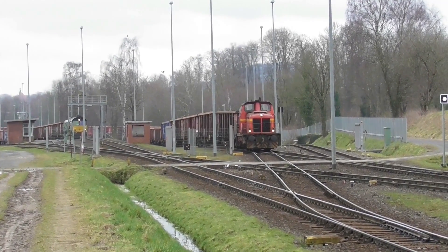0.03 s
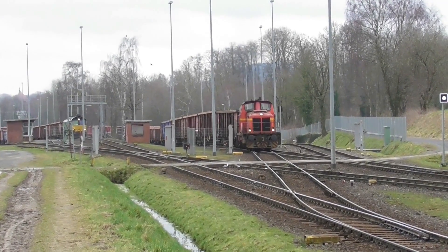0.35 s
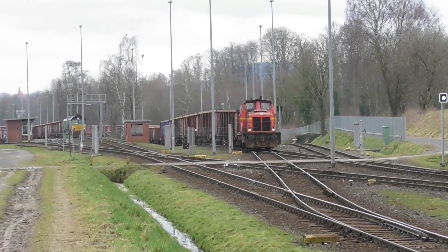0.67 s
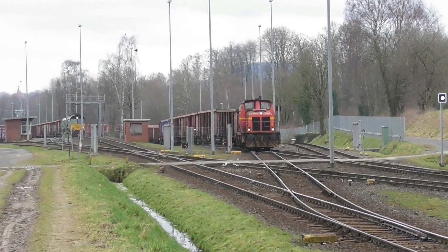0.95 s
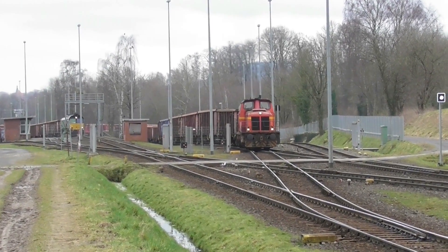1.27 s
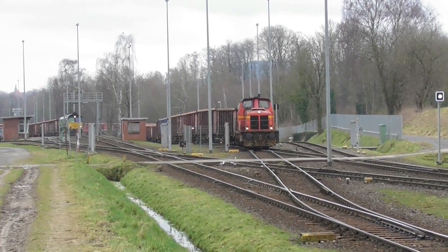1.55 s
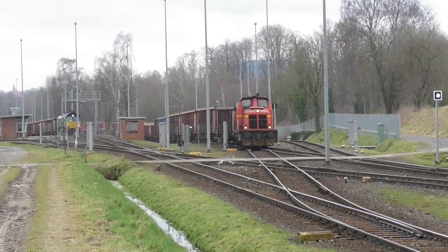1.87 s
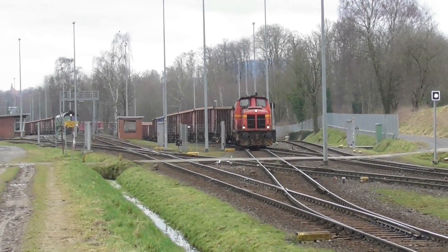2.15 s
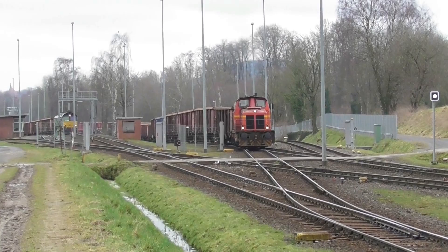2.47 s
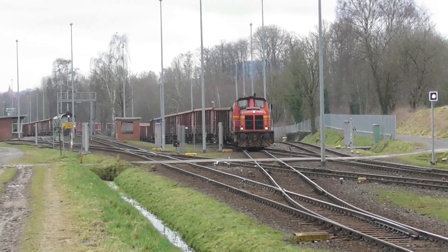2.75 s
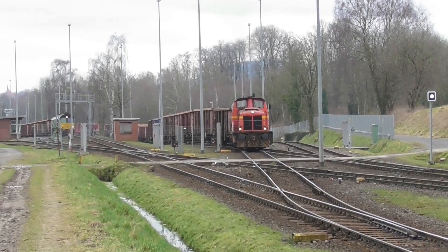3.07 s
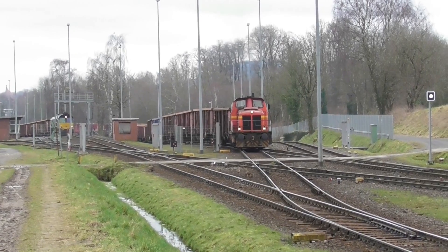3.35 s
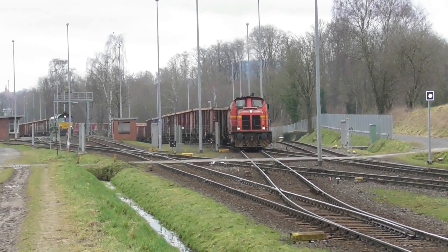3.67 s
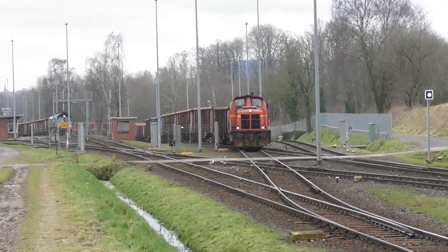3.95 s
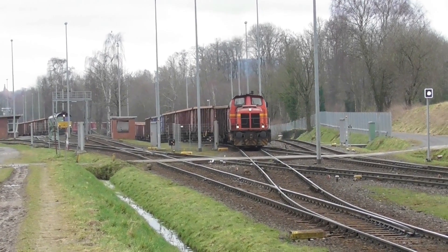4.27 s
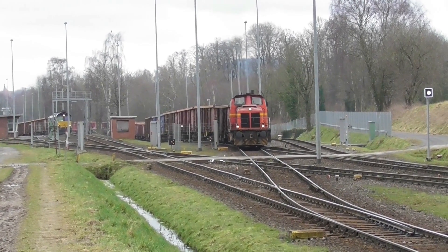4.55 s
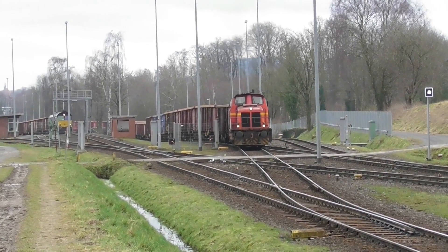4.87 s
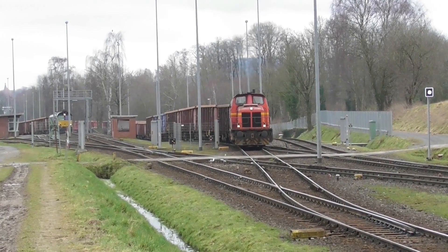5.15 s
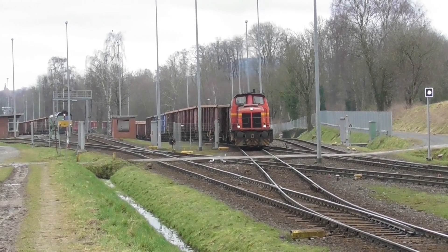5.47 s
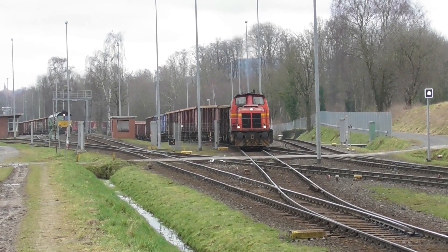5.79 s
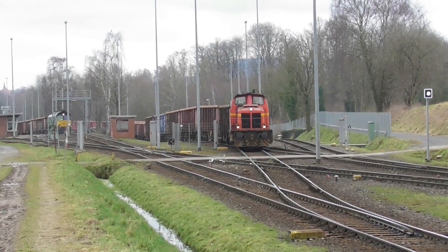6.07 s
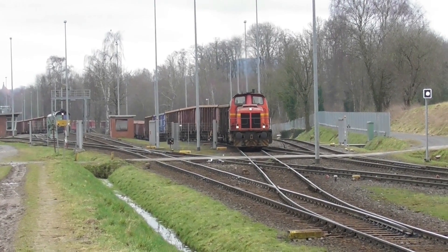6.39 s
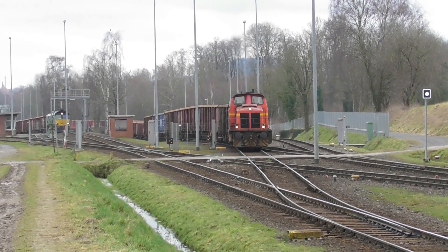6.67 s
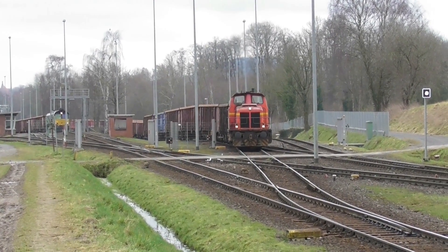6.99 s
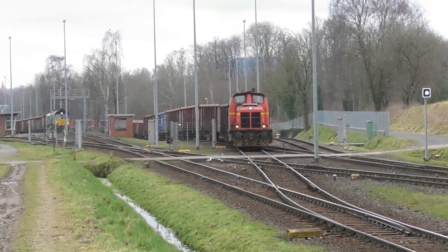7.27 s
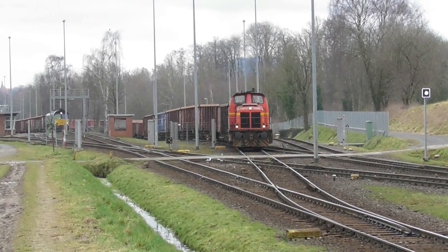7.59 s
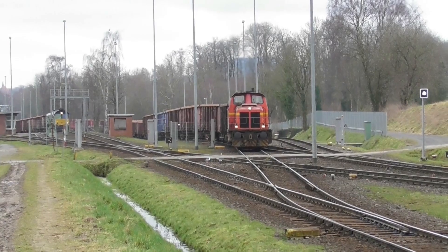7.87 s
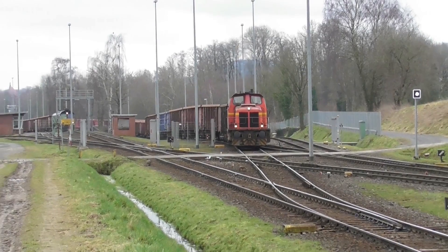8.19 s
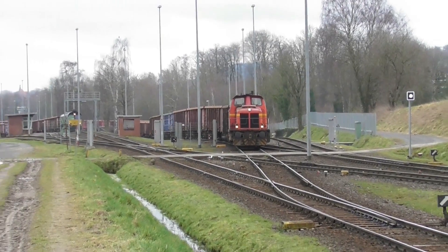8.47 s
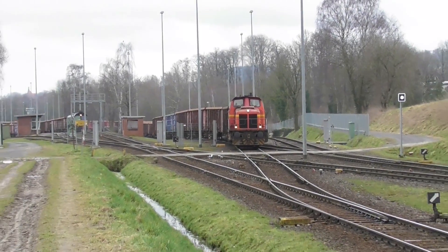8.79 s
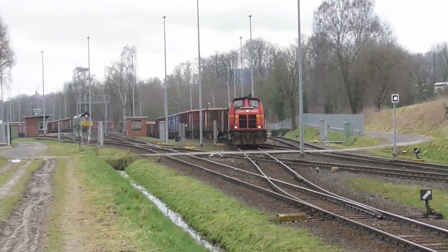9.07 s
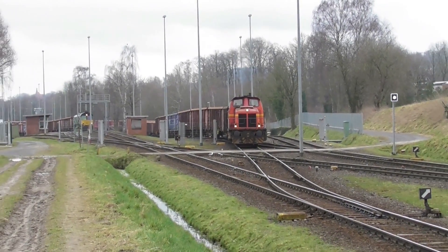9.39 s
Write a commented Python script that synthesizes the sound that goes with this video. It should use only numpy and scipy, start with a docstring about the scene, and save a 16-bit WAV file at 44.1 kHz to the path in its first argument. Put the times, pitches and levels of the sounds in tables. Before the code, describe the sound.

A diesel shunting locomotive pulls wagons slowly across an open rail yard, heard from a distance through a stereo microphone. Throughout the nine and a half seconds, its engine holds a strong, low drone at a steady pitch, with a pulsing exhaust rasp, blurred valve clatter and a light hiss of air. A quieter gear whine climbs gradually as the train gathers pace, and the clatter grows slightly from about 3 seconds. From 4.5 to 6.2 seconds, wheel flanges squeal on the points in a string of short, high, fluttering bursts that ring and echo, ending on a lower note. At about 4.9 seconds the overall level drops a little, recovering by 6.4 seconds. One faint squeal comes at around 8.3 seconds. A soft, bright hiss swells from 9.2 seconds to the end, over the continuing drone.

```python
"""Diesel shunter in a rail yard

A six-cylinder shunter hauls wagons slowly across the yard toward a camera's stereo microphone.
Its governed engine drones and rasps at the stack, valves clatter in the distance, air hisses, and
the gears whine higher as the train gathers pace. Halfway, wheel flanges squeal in the points and
echo off trees and wagons, and the level dips briefly. A bright hiss swells at the very end."""
import sys
import numpy as np
from scipy import signal
from scipy.fft import rfft, irfft, next_fast_len
from scipy.io import wavfile
from scipy.ndimage import map_coordinates

SR = 44100
rng = np.random.default_rng(int(sys.argv[2]) if len(sys.argv) > 2 else 0)


def wav_out(sig):
    """Save sig, one row per channel (or a flat mono array), as 16-bit PCM at SR to the path in sys.argv[1]."""
    wavfile.write(sys.argv[1], SR, np.round(np.clip(np.atleast_2d(sig).T, -1, 1) * 32767).astype(np.int16))


N = 416304

# How alike the engine's noise is left and right. Each row: frequency in Hz, coherence from 0 to 1.
ENGINE_COHERENCE = [(30, .5), (120, 1), (250, 0.55), (500, .9), (1000, 0.87), (2000, 0.94), (4000, 0.97),
                    (6100, 1), (8000, 1)]
# Rise and fall of the valve clatter. Each row: time in seconds, relative level in dB.
CLATTER_DB = [(0, -31.5), (2.4, -31), (3.2, -28.6), (5.6, -28.5), (6.0, -26.5), (7.7, -27.5), (9.44, -27.8)]
CYLINDERS, SHAFT_START_HZ = 6, 22.38
SIDES = np.array([[0.5], [-0.5]])  # shares a left-minus-right difference between the channels


def amp(db):
    """Decibels to gain."""
    return np.exp(np.asarray(db) * (np.log(10) / 20))


def along(points, hz):
    """Rows of frequency and value, read on a log axis."""
    freqs, values = np.transpose(points)
    return np.interp(np.log(hz + 1), np.log(freqs + 1), values)


def curve(points):
    """Rows of seconds and value, joined into one value per sample."""
    seconds, values = np.transpose(points)
    return np.interp(np.arange(N) / SR, seconds, values)


def wobble(rate):
    """A smooth random curve with rate knots a second."""
    coarse = np.arange(0, N + 64, 64)
    knots = rng.standard_normal(4096)
    return np.interp(np.arange(N), coarse, map_coordinates(knots, [coarse * rate / SR], mode="wrap"))


def turning(hz):
    """Angle of something that turns at hz."""
    return 2 * np.pi * np.cumsum(hz) / SR


def filtered(x, response):
    """x shaped by a complex response of frequency."""
    size = next_fast_len(N + SR // 4, True)
    return irfft(rfft(x, size) * response(np.fft.rfftfreq(size, 1 / SR)), size)[..., :N]


def rush(spectrum, coherence, gate=1):
    """Stereo noise of rms 1, gated before it is coloured."""
    def colour(hz):
        spread = np.arccos(np.clip(along(coherence, hz), -1, 1)) / 2
        return amp(along(spectrum, hz)) * [np.cos(spread), np.sin(spread)]
    mid, side = filtered(gate * rng.standard_normal((2, N)), colour)
    stereo = np.array([mid + side, mid - side])
    return stereo / np.sqrt(np.mean(stereo ** 2))


def tone(angle, db):
    """A sine of the given rms level, starting anywhere in its cycle."""
    return np.sqrt(2) * amp(db) * np.sin(angle + rng.uniform(0, 2 * np.pi))


def engine_cycle():
    """Angle of the governed four-stroke cycle: every cylinder fires once a turn."""
    # Each row: time in seconds, firing rate in Hz.
    firing_hz = [(0, 88.68), (2.0, 88.78), (4.0, 89.16), (6.0, 88.84), (7.4, 89), (9.44, 88.77)]
    return turning(curve(firing_hz)) / CYLINDERS


def engine_drone(cycle, waver_db=2.0, steady_db=0.1, sway_db=0.32, clatter_share=0.41):
    """Firing harmonics add up to one pulse per cylinder; the orders between come from the block."""
    # Engine tones. Each row: multiple of the cycle rate, level in dB.
    orders = [(5, -46.5), (6, -8), (7, -33.5), (8, -44.5), (9, -38), (10, -46.5), (11, -46.5), (12, -25),
              (18, -38.5), (26, -46.5), (27, -52), (29, -41.5), (30, -37), (32, -41.5), (33, -42.5),
              (34, -46), (35, -42), (36, -31.5), (40, -52), (42, -44.5), (43, -37), (44, -44.5),
              (51, -56.5), (54, -52), (62, -50), (70, -41.5), (84, -41.5), (127, -40.5)]
    # The drone leans slightly right for a while. Each row: time in seconds, left minus right in dB.
    lean_db = [(0, .35), (3, 0.4), (7, -0.7), (9.44, 0)]
    clatter_db = curve(CLATTER_DB)
    out = np.zeros(N)
    for order, db in orders:
        angle = order * cycle
        if 30 <= order < 45:  # near the exhaust's peak, 440 to 650 Hz, tones follow the clatter
            db = db + clatter_share * (clatter_db - np.mean(clatter_db))
        if order in (CYLINDERS, 2 * CYLINDERS):  # the firm pressure wave from the stack
            depth_db = steady_db * order / (2 * CYLINDERS)
            out += np.sqrt(2) * amp(db + depth_db * wobble(11)) * np.sin(angle)
        elif order % CYLINDERS == 0:  # the pipe rings on each crest, wavering in the outdoor air
            out += np.sqrt(2) * amp(db + waver_db * wobble(4)) * np.cos(angle)
        else:
            out += tone(angle, db + waver_db * wobble(4))
    return out * amp(sway_db * wobble(2)) * amp(SIDES * curve(lean_db))


def exhaust_rasp(cycle, shaft_hz, start_db=-25.5, ease_db_per_hz=0.48, puff=0.33, lope=0.066):
    """Each firing puffs noise out of the stack; unequal cylinders make it lope once a cycle."""
    # Each row: frequency in Hz, relative noise density in dB.
    spectrum = [(20, -15), (35, -1.5), (60, 4.5), (125, 3), (200, -2.5), (300, -2), (400, -5), (480, -2.5),
                (630, 0), (720, -9.5), (1000, -33.5), (2000, -69)]
    puffs = (1 + puff * np.cos(CYLINDERS * cycle)) * (1 + lope * np.cos(cycle))
    level_db = start_db - ease_db_per_hz * (shaft_hz - SHAFT_START_HZ)  # eases as the train speeds up
    return amp(level_db + 0.43 * wobble(5.8)) * rush(spectrum, ENGINE_COHERENCE, puffs)


def clatter_and_hiss(cycle, knock=0.15, throb=0.064):
    """Valve and injector clatter blurred by distance, and the hiss of air through the engine."""
    # Colour of each noise. Each row: frequency in Hz, relative noise density in dB.
    clatter_spectrum = [(400, -30.5), (700, -14), (860, 1.5), (1080, 2.5), (1280, 0.5), (1500, 3.5),
                        (1680, -0.5), (1950, 2), (2300, -1), (2550, -6.5), (2900, -1.5), (3800, -11),
                        (4300, -41), (8000, -80.5)]
    hiss_spectrum = [(1500, -17.5), (2500, -4.5), (3000, -3), (3800, 1), (4000, -8), (4220, -6),
                     (4430, -15.5), (4700, -10), (5600, -9), (6120, 2.5), (6600, -12), (7000, -18),
                     (7600, -22), (10000, -39)]
    # Rise and fall of the hiss. Each row: time in seconds, relative level in dB.
    hiss_db = [(0, -40.5), (.8, -39.5), (1.7, -38.5), (2.35, -35), (3.9, -42), (4.75, -39), (5.3, -40),
               (7.6, -40), (8.8, -36), (9.44, -35)]
    knocks = 1 + knock * np.cos(2 * CYLINDERS * cycle)
    throbs = 1 + throb * np.cos(cycle) + throb / 2 * np.cos(CYLINDERS * cycle)
    clatter = rush(clatter_spectrum, ENGINE_COHERENCE, knocks)
    hiss = rush(hiss_spectrum, ENGINE_COHERENCE, throbs)
    clatter *= amp(curve(CLATTER_DB) + 4 + 0.5 * wobble(9))
    hiss *= amp(curve(hiss_db) + 5.5 + 0.57 * wobble(12))
    return clatter + hiss


def flange_squeal(wander_hz=9, flutter_db=1.5, arch=0.53, ring_db=-11, t60=1.9,
                  twin_split=0.012, twin_db=-8.5):
    """A flange sticks and slips on the rail: twin wheel modes swell, beat, flutter and ring on."""
    # Bites on the rail. Each row: start in seconds, length in seconds, wheel mode in Hz, level in dB.
    bites = [(4.462, 0.18, 5120, -36), (4.622, 0.13, 5090, -39.5), (4.738, 0.098, 4900, -40),
             (4.771, 0.15, 2780, -25.5), (4.789, 0.23, 5020, -31.5), (4.79, .22, 9930, -61.5),
             (4.913, 0.075, 2770, -17.5), (4.9, .26, 4540, -47.5), (4.97, 0.17, 2757, -16.5),
             (5.1, 0.064, 5010, -36), (5.138, .14, 2763, -15.5), (5.33, 0.08, 2770, -15),
             (5.461, .23, 2757, -21.5), (5.49, .09, 4680, -43.5), (5.588, .16, 8030, -63),
             (5.579, 0.45, 2940, -27), (5.601, .36, 5050, -42), (5.781, 0.22, 4230, -47),
             (5.77, 0.28, 2103, -25.5), (6.05, 0.11, 2100, -28), (8.33, 0.42, 2575, -35)]
    t, out = np.arange(N) / SR, np.zeros(N)
    drift = turning(wander_hz * wobble(110))
    flutter = amp(flutter_db * wobble(70))
    for start, length, hz, db in bites:
        sounding = (t > start) & (t < start + length + t60)
        age = t[sounding] - start
        bite = np.abs(np.sin(np.pi * np.minimum(age / length, 1))) ** arch  # smaller arch, flatter top
        ring = (age > length / 2) * amp(ring_db - 60 * np.maximum(age - length, 0) / t60)
        angle = 2 * np.pi * hz * age + drift[sounding] * (hz / 2100)  # higher modes wander more
        pair = tone(angle, db) + tone(angle * (1 + twin_split), db + twin_db)
        out[sounding] += flutter[sounding] * np.maximum(bite, ring) * pair
    return out


def shaft_speed(rise_hz_per_s=0.4975, cruise_s=13.3):
    """The transmission shaft, tied to the wheels, speeds up ever more gently toward its cruise."""
    t = np.arange(N) / SR
    return SHAFT_START_HZ + np.cumsum(rise_hz_per_s * (1 - (t / cruise_s) ** 2)) / SR


def gear_whine(shaft_hz, waver_db=1.95, jitter_rad=0.0072):
    """Gear tones climb with the train's speed and swell as they cross the casing's resonances."""
    # Each row: meshes per shaft turn, level in dB before the casing lifts it.
    gear_tones = [(8, -38), (16, -45.5), (21, -39.5), (24, -40), (32, -56.5), (42, -41), (55, -47.5),
                  (56, -41.5)]
    # Gear case resonances. Each row: centre in Hz, width in Hz, lift in dB.
    casing = [(192, 14, 8), (368, 16, 7), (487, 20, 7), (588, 26, 7), (618, 10, 7), (1064, 70, 10),
              (1356, 24, 17)]
    shaft_angle, out = turning(shaft_hz), np.zeros(N)
    for meshes, db in gear_tones:
        tone_hz = meshes * shaft_hz
        lift_db = sum(lift / (1 + (2 * (tone_hz - hz) / width) ** 2) for hz, width, lift in casing)
        angle = meshes * (shaft_angle + jitter_rad * wobble(14))
        out += tone(angle, db + lift_db + waver_db * wobble(4.5))
    return out


def fan(cycle, blades_per_cycle=85.6):
    """A belt-driven fan sings in step with the engine."""
    return tone(blades_per_cycle * cycle, db=-46 + 2 * wobble(2.9))


def yard_echo(x, level_db=-15.5):
    """Trees and wagons scatter the sound back; the high treble dies first."""
    # Each row: frequency in Hz, seconds to fade by 60 dB.
    decay = [(200, .5), (2500, 0.95), (10000, 0.11)]
    hz, t, noise = signal.stft(rng.standard_normal((2, SR // 2)), SR, nperseg=256)
    fade = amp(-60 * t / along(decay, hz)[:, None])
    tail = signal.istft(noise * fade, SR, nperseg=256)[1]
    tail /= np.linalg.norm(tail[0])
    return amp(level_db) * signal.fftconvolve(x[None], tail, axes=1)[:, :N]


def background_hiss():
    """A faint, even hiss lies under the train; a brighter one swells at the very end."""
    # Course of each hiss. Each row: time in seconds, level in dB.
    even_db = [(0, -55.5), (1.5, -54.5), (5, -55), (9.44, -58.5)]
    swell_db = [(9.15, -83.5), (9.3, -57.5), (9.44, -46)]
    # Colour of each hiss. Each row: frequency in Hz, relative noise density in dB.
    even_spectrum = [(1000, -5.5), (8000, -2), (12000, -3), (15800, -5)]
    swell_spectrum = [(2000, -26), (5000, -6.5), (9000, -13.5), (14000, -32)]
    even = amp(curve(even_db)) * rush(even_spectrum, coherence=[(1000, 0.66)])
    swell = amp(curve(swell_db)) * rush(swell_spectrum, coherence=[(1000, 0.9)])
    return even + swell


def microphone_ports(x):
    """The two ports hear each frequency at a different level and phase."""
    # Each row: frequency in Hz, left minus right in dB.
    balance = [(30, 4.5), (100, -1.35), (170, -1.3), (300, -5), (510, -2.5), (860, -3), (1470, 1.3),
               (2500, 0.4), (4270, 2), (6000, 0)]
    # Each row: frequency in Hz, phase lead of the left port in radians.
    lead = [(90, 0), (260, 0.26), (500, .7), (690, 0.88), (950, 0.62), (1890, 0.25), (2150, 0.49),
            (2670, 0.22), (3400, 0.15), (5170, 0.2), (7410, 0)]
    return filtered(x, lambda hz: amp(SIDES * along(balance, hz)) * np.exp(1j * SIDES * along(lead, hz)))


def level_dip(start_s=4.92, fall_s=0.015, hold_s=0.4, recover_s=1.05, left_db=-3.5, right_db=-2.5):
    """Gain of each channel: it drops at once, stays low a moment and creeps back."""
    corners = start_s + np.cumsum([0, fall_s, hold_s, recover_s])
    depth = np.interp(np.arange(N) / SR, corners, [0, 1, 1, 0])
    return amp(np.outer([left_db, right_db], depth))


def scene():
    """The train from across the yard, heard through two microphone ports over a faint hiss."""
    cycle, shaft_hz = engine_cycle(), shaft_speed()
    squeal = flange_squeal()
    tones = engine_drone(cycle) + gear_whine(shaft_hz) + fan(cycle)
    noises = exhaust_rasp(cycle, shaft_hz) + clatter_and_hiss(cycle)
    return microphone_ports(tones + noises + squeal + yard_echo(squeal)) + background_hiss()


def record(dry):
    """The level dips briefly; the camera rounds off the highest peaks and cuts the top treble."""
    full_scale, top_hz = 0.97, 15780
    dipped = dry * level_dip()
    rounded = dipped / (1 + (dipped / full_scale) ** 20) ** (1 / 20)
    return filtered(rounded, lambda hz: hz < top_hz)


dry = scene()
out = record(dry)
wav_out(out)
```